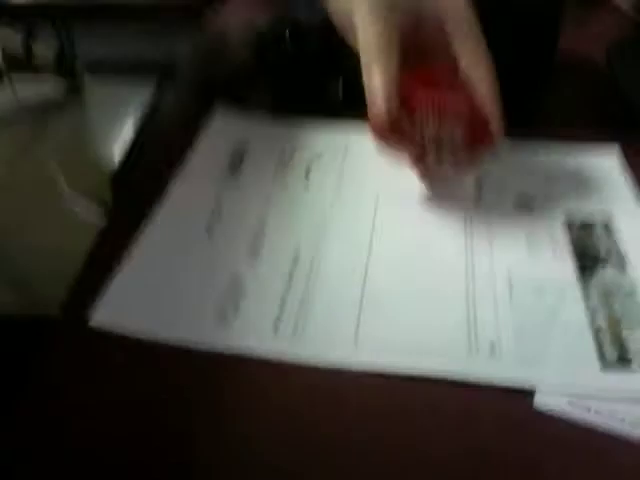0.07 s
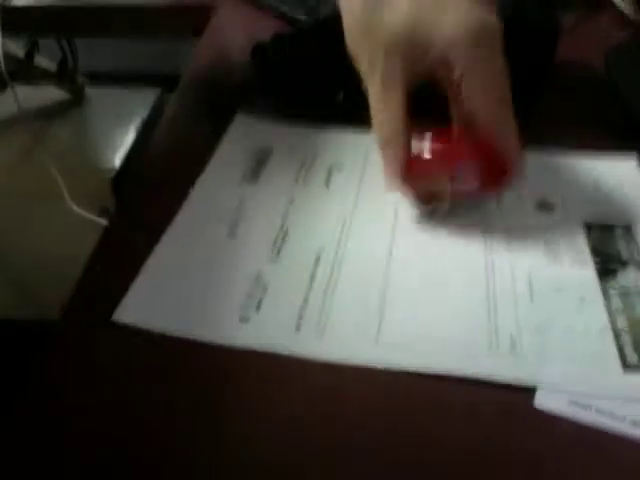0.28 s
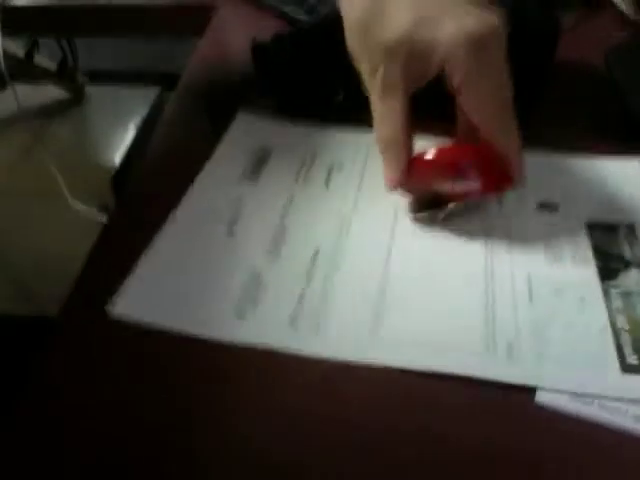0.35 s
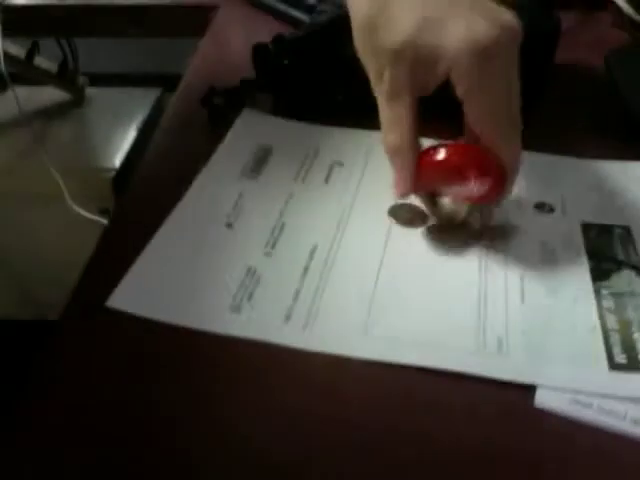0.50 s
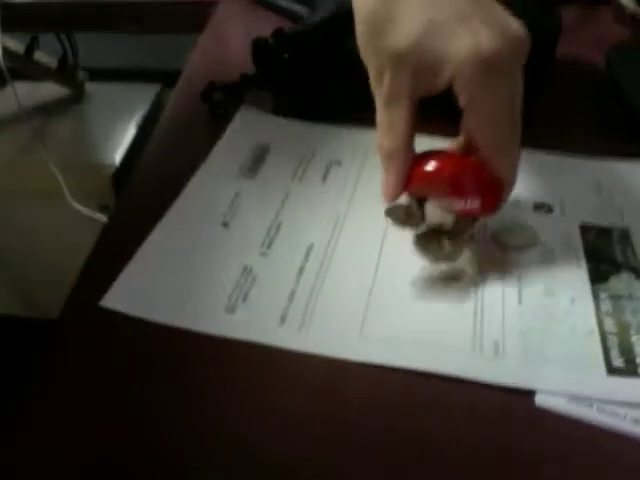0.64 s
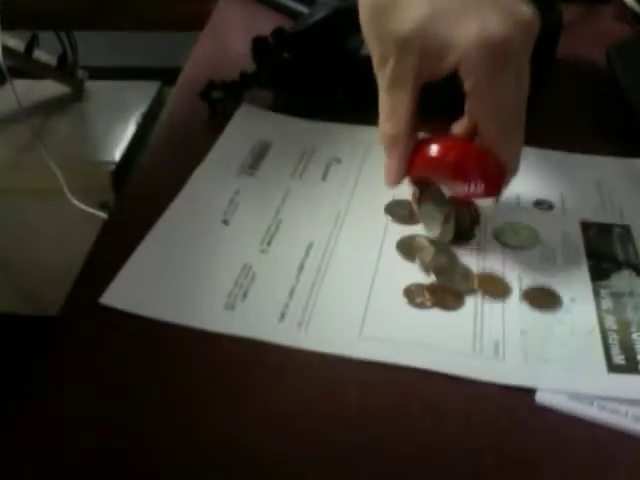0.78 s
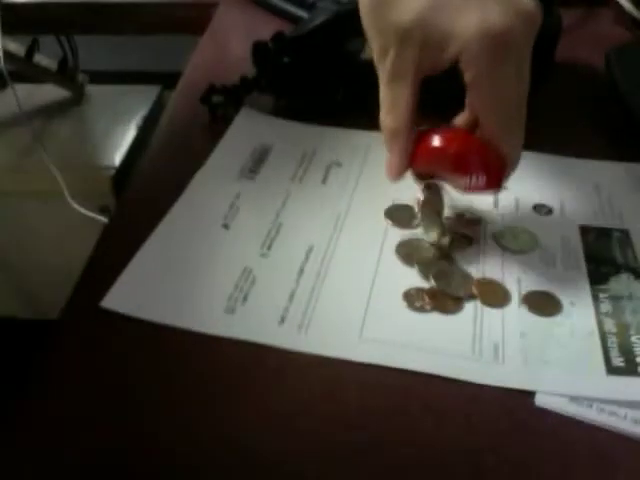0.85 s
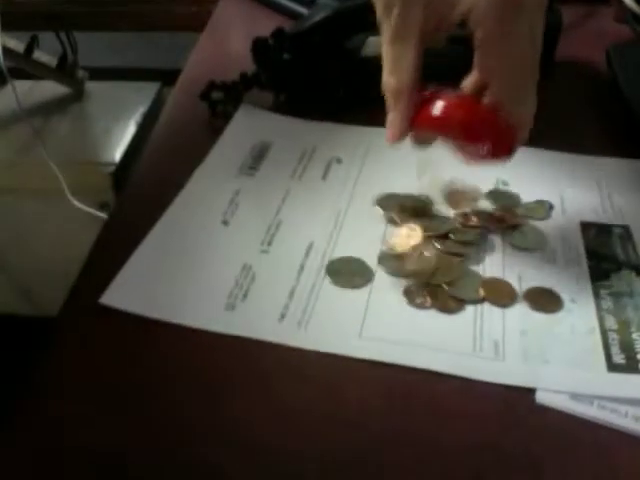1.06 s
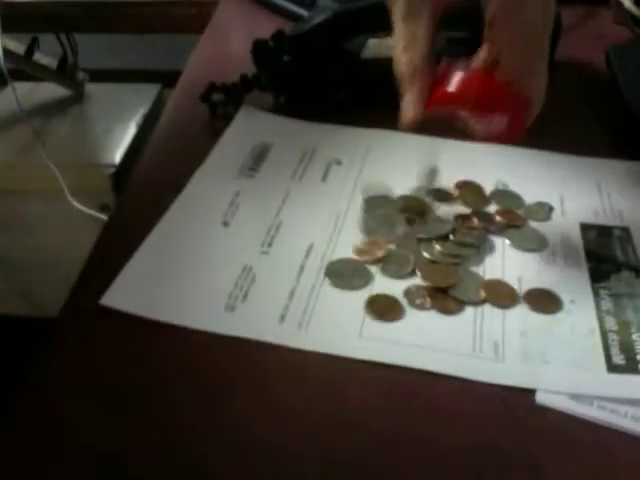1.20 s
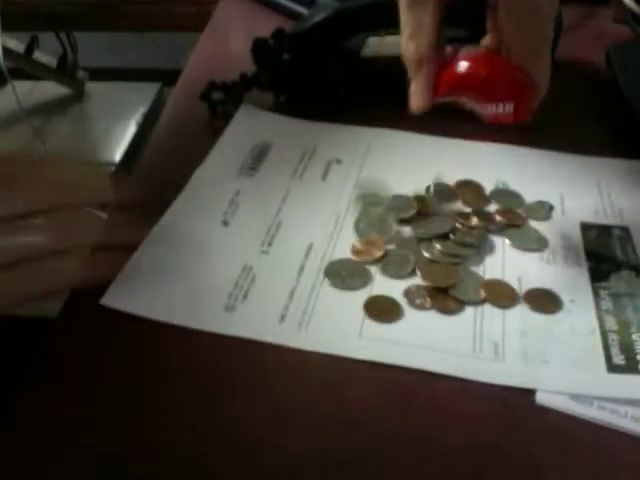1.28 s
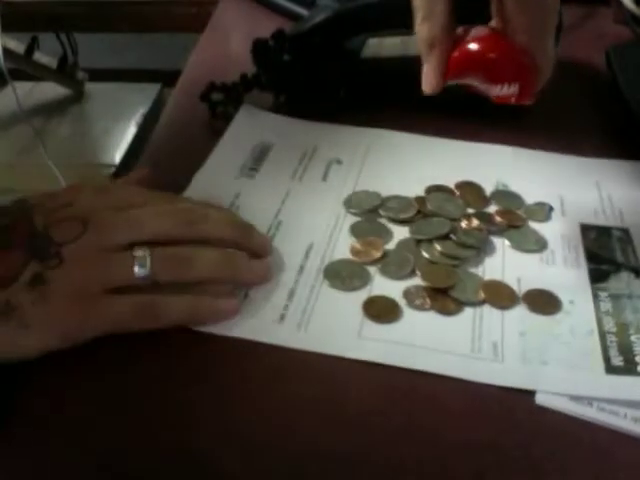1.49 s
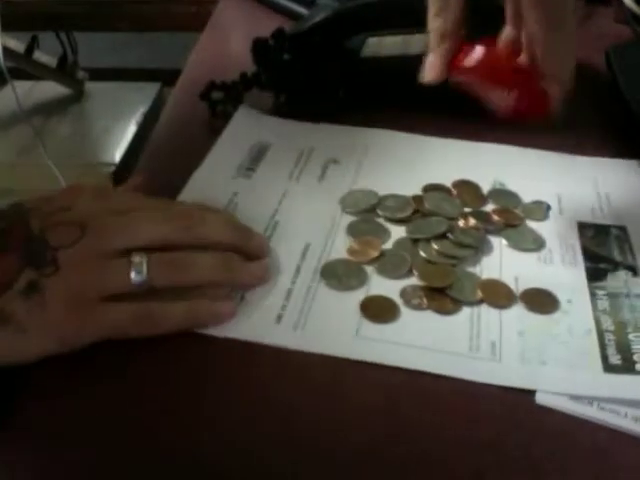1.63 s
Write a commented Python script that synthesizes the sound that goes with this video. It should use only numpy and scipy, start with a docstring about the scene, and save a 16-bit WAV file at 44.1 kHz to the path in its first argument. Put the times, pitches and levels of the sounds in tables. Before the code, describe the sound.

Coins spill onto a paper-covered wooden table, close by in a quiet room. They shift and click in a plastic cup at about 0.2 seconds, then pour out from 0.4 seconds in a dense clatter of hard clacks and high metallic rings. The spill is busiest around 1 second, with a heavier woody knock near 1.2 seconds. The clinks thin out and the last coin settles softly around 1.5 seconds.

```python
"""Coins tipped onto a table

A handful of coins slides from a small plastic cup onto paper on a wooden table, close by in a room.
Each knock is a clack, a thud in the table and a metal tick; between knocks the coins jostle.
Coins that bounce free ring high, heaps land with a woody knock, and the room adds a short tail."""
import sys
import numpy as np
from scipy import signal
from scipy.fft import rfft, irfft
from scipy.io import wavfile
from scipy.ndimage import uniform_filter1d

SR = 44100
rng = np.random.default_rng(int(sys.argv[2]) if len(sys.argv) > 2 else 0)


def to_wav(s):
    """Save 16-bit WAV."""
    ch = np.atleast_2d(s).T  # columns
    pcm = np.round(np.clip(ch, -1, 1) * 32767)  # PCM
    wavfile.write(sys.argv[1], SR, pcm.astype(np.int16))


N = 72765


def undb(db):
    """Decibels to gain."""
    return 10 ** (np.asarray(db) / 20)


def fade(t, t60):
    """Full level until t = 0, then an exponential decay, 60 dB down after t60."""
    return np.exp(-np.log(1000) * np.maximum(t, 0) / t60)


def colour(x, points):
    """Shape a sound to an EQ curve of (Hz, dB) points with a causal filter of unit power gain."""
    hz, db = np.array(points).T
    size = 4096
    freqs = np.maximum(np.arange(size // 2 + 1) * SR / size, 1)
    gain = undb(np.interp(np.log(freqs), np.log(hz), db))
    cepstrum = irfft(np.log(gain))
    cepstrum[1:size // 2] *= 2  # minimum phase keeps the attacks sharp
    cepstrum[size // 2 + 1:] = 0
    response = irfft(np.exp(rfft(cepstrum)))
    return signal.fftconvolve(x, response / np.linalg.norm(response))[:N]


def add(out, start, sound):
    """Mix a sound in from its start time."""
    i = int(np.clip(start * SR, 0, N - 1))
    out[i:i + len(sound)] += sound[:N - i]


def ring(hz, t60, size=SR // 3):
    """One decaying mode."""
    t = np.arange(size) / SR
    return np.sin(2 * np.pi * hz * t) * fade(t, t60)


# The room tone's EQ. Each row: frequency in Hz, relative level in dB.
ROOM_TONE_EQ = [(40, -3.5), (90, -1.5), (200, -7), (350, -9.5), (550, -11), (900, -18), (1400, -26),
                (2700, -18.5), (5000, -30.5), (9000, -32.5), (15000, -43.5)]


def room_tone():
    """A quiet, dark bed of room noise."""
    return undb(-62.5) * colour(rng.standard_normal(N), ROOM_TONE_EQ)


# The table with the cup just above it. Each row: pitch in Hz, relative level in dB, T60 in seconds.
TABLE_MODES = [(116.2, -3.5, 0.34), (160, -27, 0.05), (233, -3, 0.16), (334, -6, 0.13), (453, -8, 0.043),
               (559.7, 5.5, 0.092), (622.3, -4.5, 0.15), (844.4, -0.5, 0.15), (1123, -10, 0.17),
               (1167, -0.5, 0.032), (1377, 1, 0.1), (1766, 4.5, 0.084), (2110, -3.5, 0.038),
               (2460, -0.5, 0.048), (2565, 3, 0.046), (3570, -9.5, 0.086), (4380, -8, 0.14)]
LIGHT_HZ = 417  # coins are too light to drive the modes below this well


def table_ring(times, db):
    """Each blow rings the table and cup, with a mix of modes that depends on where it lands."""
    out = np.zeros(N)
    onsets = np.clip(times * SR, 0, N - 1).astype(int)
    for hz, mode_db, t60 in TABLE_MODES:
        polarity, scatter = rng.standard_normal((len(times), 2)).T
        blows = np.zeros(N)
        np.add.at(blows, onsets, np.sign(polarity) * undb(db + 2 * scatter))
        gain = undb(mode_db - 11.5) / (1 + (LIGHT_HZ / hz) ** 2)
        out += gain * signal.fftconvolve(blows, ring(hz, t60))[:N]
    return out


# A loose coin's partials. Each row: pitch in Hz, relative level in dB, T60 in seconds.
COIN_MODES = [(5950, -2, .025), (6450, 0, .025), (8200, -1, .025), (9300, -1, .06), (10400, -1, .03),
              (12450, -1, .06), (15250, -2, .07)]


def clinks(times, db):
    """Each contact rings a coin, tuned a little differently and soon damped by its neighbours."""
    out = np.zeros(N)
    looseness = np.interp(times, (.45, .95), (.25, 1))  # coins ring longer as the cup empties
    for hz, mode_db, t60 in COIN_MODES:
        for start, level, loose in zip(times, db, looseness):
            detune, scatter = rng.standard_normal(2)
            partial = ring(hz * (1 + .025 * detune), t60 * loose, size=3300)
            add(out, start, undb(level + mode_db - 10 + 4 * scatter) * partial)
    return out


def chatter(times, db, eq, hold_s, t60, attack_s=.00049):
    """A coin chatters for a few milliseconds at each contact, then dies away."""
    out, t = np.zeros(N), np.arange(SR // 16) / SR
    envelope = np.minimum(t / attack_s, 1) * fade(t - hold_s, t60)
    bursts = rng.choice([-1., 1.], (len(times), len(t))) * envelope
    for start, gain, burst in zip(times, undb(db), bursts):
        add(out, start, gain * burst)
    return colour(out, eq)


# EQs of the woody thud, hard clack and bright tick. Each row: frequency in Hz, relative level in dB.
THUD_EQ = [(40, -30), (90, -57.5), (200, -9), (330, -7.5), (540, 3.5), (720, -7.5), (1150, 5), (1500, -1.5),
           (2200, -26.5)]
CLACK_EQ = [(900, -30), (1500, -10), (1950, 0), (2500, 1.5), (3100, -5), (4050, -2.5), (4800, -12.5),
            (7000, -45.5)]
TICK_EQ = [(3500, -25.5), (5200, -2), (6300, 2.5), (7400, -4), (8300, -0.5), (9700, 0.5), (11200, -4),
           (12600, -4), (13700, -8), (15500, -7.5)]


def contacts(times, clack_db, thud_db, tick_db):
    """Each coin contact is a thud, a clack and a tick, and leaves the table and the coin ringing."""
    thud = chatter(times, thud_db - 1, THUD_EQ, hold_s=.0047, t60=.025)
    clack = chatter(times, clack_db + 2.5, CLACK_EQ, hold_s=.0014, t60=.032)
    tick = chatter(times, tick_db + 3.5, TICK_EQ, hold_s=.00071, t60=.024, attack_s=.00057)
    return thud + clack + tick + table_ring(times, (clack_db + thud_db) / 2) + clinks(times, tick_db)


# The jostle's fader moves. Each row: time in seconds, relative clack and tick levels in dB.
JOSTLE_LEVELS = [(0.099, -75, -64), (0.158, -66, -45), (.22, -79, -41.5), (0.279, -43, -32),
                 (.335, -50, -55), (0.389, -43.5, -31.5), (0.5, -40, -30), (.59, -27, -21.5),
                 (0.681, -28.5, -32.5), (.755, -38.5, -32.5), (.81, -29.5, -25.5), (.925, -27.5, -30),
                 (0.958, -22.5, -19.5), (1.07, -21.5, -17.5), (1.21, -35.5, -37.5), (1.333, -23.5, -26),
                 (1.402, -41.5, -41), (1.5, -78.5, -91.5)]


def jostle(count=260, scatter_db=3.5):
    """Many small contacts at uneven moments as the coins slide over each other."""
    cues, clacks, ticks = np.array(JOSTLE_LEVELS).T
    times = cues[0] + (cues[-1] - cues[0]) * (np.arange(count) + rng.random(count)) / count
    clack_db = np.interp(times, cues, clacks) - 4.5 + scatter_db * rng.standard_normal(count)
    tick_db = np.interp(times, cues, ticks) - 6 + scatter_db * rng.standard_normal(count)
    return contacts(times, clack_db, clack_db - 4, tick_db)


# The featured hits. Each row: start in seconds, relative clack level in dB, thud and tick offsets in dB.
KNOCK_CUES = [(0.1263, -64, -8, 14.5), (0.1556, -53, -33, 11.5), (0.1718, -45.5, -47, -7),
              (0.195, -52, -37, 9), (0.207, -53, -44, 8), (0.2313, -9, -6.5, -14),
              (0.267, -20.5, -1.5, -11), (0.278, -20.5, 0, -5.5), (0.2986, -47, 7, 14.5),
              (0.348, -36.5, -4, 3.5), (0.3974, -19.5, -2.5, -32), (0.4159, -29, -22, -4.5),
              (0.4262, -26, -3, -15), (0.443, -11.5, -7, -14.5), (0.4788, -23, -11, -21),
              (0.4869, -15.5, -8, -29), (0.5084, -16, -4, -2.5), (0.5236, -9.5, -8, -31),
              (0.543, -12.5, -8, 0), (0.5595, -15, -10.5, -20), (0.5704, -10, -3, -17),
              (0.599, -16.5, -11, -9), (0.6076, -15, -4.5, -9.5), (0.6218, -15.5, -12, 2),
              (0.6372, -18.5, -1.5, -10), (0.665, -13, -17, -6), (0.719, -27.5, -22, -20),
              (0.7641, -21, -1.5, -10), (0.77, -21.5, -19, -4.5), (0.7894, -15, -4.5, -7.5),
              (0.793, -11.5, -11.5, -9.5), (0.8152, -46.5, -11.5, 1), (0.8322, -28, -5.5, -8),
              (0.851, -15, -7.5, -1.5), (0.876, -23.5, -6, -1.5), (0.884, -25, -21, 4),
              (0.8897, -19.5, -7, -2.5), (0.9224, -22, -2.5, 0.5), (0.9388, -12.5, -6, -9),
              (0.948, -14, -6, -2), (0.9545, -22.5, -1, 5.5), (0.9669, -20, -23, -12.5),
              (0.9809, -15, -13.5, -8.5), (0.9966, -19, -20.5, -2), (1.001, -16.5, -12, -10.5),
              (1.0148, -12.5, -11, -9), (1.027, -14.5, -5, -1.5), (1.0571, -21, -10, -4),
              (1.0771, -24, -0.5, -13.5), (1.0918, -34.5, -19, -7), (1.116, -24, -1, -1.5),
              (1.146, -24, 2.5, -3.5), (1.1522, -19.5, -12, -2.5), (1.1633, -23.5, -20.5, -7),
              (1.1842, -29, 0.5, -1), (1.1985, -27.5, -7, -16.5), (1.228, -14, -9, -1.5),
              (1.2655, -31, -16.5, -15.5), (1.2755, -30.5, -4.5, -2), (1.289, -30, -2, 5),
              (1.3176, -19, -4.5, -4), (1.3318, -32, 1.5, 8), (1.341, -36.5, 8.5, 5),
              (1.371, -33.5, -4, -15), (1.393, -54, -8.5, 9.5), (1.416, -33.5, -1, -22.5),
              (1.4333, -40.5, -10.5, -2.5), (1.448, -33.5, -7.5, -28.5), (1.463, -56, -8, 6)]


def knocks():
    """The distinct blows of coins on the cup, table and pile."""
    times, clack_db, thud_offset, tick_offset = np.array(KNOCK_CUES, float).T
    return contacts(times, clack_db, clack_db + thud_offset, clack_db + tick_offset)


# The plastic cup's EQ. Each row: frequency in Hz, relative level in dB.
CUP_EQ = [(1200, -35.5), (1750, 2), (2150, 8.5), (2600, -9), (3200, -22.5), (4200, 0), (6000, -34.5)]


def cup_slide(start_s=.153, hold_s=.088, slips_per_s=180):
    """Tiny slips of coins along the wall ring the cup as it tilts."""
    t = np.arange(N) / SR - start_s
    chance = slips_per_s / SR
    slips = (rng.random(N) < chance) * rng.standard_normal(N) / np.sqrt(chance)
    envelope = (t > 0) * fade(t - hold_s, t60=.05)
    return undb(-50) * colour(slips * envelope, CUP_EQ)


# Coins ringing free. Each row: start in seconds, pitch in Hz, relative level in dB, seconds until damped.
FREE_RINGS = [(.278, 6126, -34, .004), (.278, 7951, -36, .006), (.455, 9300, -27, .018),
              (.444, 15670, -38, .19), (.48, 9470, -35, .06), (.524, 12780, -31, .25),
              (.56, 15250, -37, .09), (.574, 9530, -27, .045), (.591, 6400, -29, .005),
              (.622, 6500, -28, .005), (.622, 9259, -30, .1), (.655, 15400, -37, .05),
              (.798, 15020, -31, .02), (.852, 15230, -28, .045), (.948, 14930, -27, .075),
              (.948, 9200, -26, .11), (.956, 12480, -27, .045), (.955, 15350, -29, .06),
              (1.015, 15640, -26, .04), (1.03, 12450, -29, .07), (1.06, 11990, -30, .06),
              (1.088, 12200, -24, .014), (1.15, 9200, -36, .13), (1.229, 12530, -32, .03),
              (1.229, 15620, -33, .12), (1.31, 15230, -27, .035), (1.332, 8830, -31, .04),
              (1.332, 9190, -33, .035), (1.335, 12490, -29, .025), (1.434, 9367, -46, .02)]


def free_coins(flutter_hz=170):
    """Coins that bounce clear sing on, shimmering as they tumble and graze, until the pile stops them."""
    out, t = np.zeros(N), np.arange(SR // 3) / SR
    graze_times = np.arange(64) / flutter_hz
    for start, hz, db, free_s in FREE_RINGS:
        grazes = np.exp(2j * np.pi * rng.random(len(graze_times)))
        shimmer = 1 + .95 * np.interp(t, graze_times, grazes)  # level and phase both waver
        tone = (shimmer * np.exp(2j * np.pi * hz * t)).imag
        envelope = fade(t, t60=.6) * fade(t - free_s, t60=.045)
        add(out, start, undb(db + .5) * tone * envelope)
    return out


# Heavy landings of several coins at once. Each row: start in seconds, relative level in dB.
LANDING_CUES = [(.9385, -32), (.949, -34), (1.013, -36), (1.2268, -23), (1.316, -37)]
# The EQ of the table top's bending wave. Each row: frequency in Hz, relative level in dB.
BEND_EQ = [(150, -26), (350, -9.5), (520, 7.5), (720, 1), (950, 5.5), (1300, -0.5), (1700, -15.5),
           (2750, 3), (4000, 4), (6000, -32)]


def landings(travel_s=.005, travel_at_hz=1000):
    """A heap lands: the table's bending wave brings highs before lows, then its modes ring."""
    out = np.zeros(N)
    soft_hz = 1087  # a heap is too soft to drive the modes above this well
    thump = sum(undb(db) / np.hypot(1, hz / soft_hz) / np.hypot(1, LIGHT_HZ / hz) * ring(hz, t60)
                for hz, db, t60 in TABLE_MODES)
    freqs = np.arange(N + 1) * SR / (2 * N)
    falling_sweep = irfft(np.exp(-4j * np.pi * travel_s * np.sqrt(travel_at_hz * freqs)))[:N]
    knock = undb(37.5) * colour(falling_sweep, BEND_EQ)
    for start, db in LANDING_CUES:
        add(out, start, undb(db) * knock)
        add(out, start + travel_s, undb(db) * thump)
    return out


# The last scrape's thin EQ. Each row: frequency in Hz, relative level in dB.
SETTLE_EQ = [(800, -12), (1900, -2), (3500, -16), (4400, -0.5), (5600, -15), (7200, 10.5), (8300, -6.5),
             (12000, -12), (14000, -25.5)]


def settle(start_s=1.537):
    """A last coin settles with a soft scrape."""
    return chatter([start_s], [-52], SETTLE_EQ, hold_s=.0037, t60=.065, attack_s=.00057)


def hum(start_s=1.576, rise_s=.029, hz=333):
    """A faint hum swells in the room at the very end."""
    t = np.arange(N) / SR
    swell = np.clip((t - start_s) / rise_s, 0, 1)
    return undb(-59) * swell * np.sin(2 * np.pi * hz * t)


# The reverb's EQ. Each row: frequency in Hz, relative level in dB.
REVERB_EQ = [(60, -32), (130, 2), (240, 7), (550, -2.5), (1500, -7.5), (3000, -4), (7000, -2.5), (15000, 2)]


def reverb(x, crossover_hz=875, predelay_s=.003):
    """The room's diffuse tail, whose bass lasts longer than its treble."""
    t = np.arange(SR // 2) / SR
    noise = rng.standard_normal(len(t))
    low, high = (signal.sosfilt(signal.butter(3, crossover_hz, kind, fs=SR, output="sos"), noise)
                 for kind in ("low", "high"))
    onset = np.clip(t / predelay_s - 1, 0, 1)
    tail = (low * fade(t, t60=.3) - high * fade(t, t60=.14)) * onset
    wet = signal.fftconvolve(x, tail / np.linalg.norm(tail))[:N]
    return undb(-9.5) * colour(wet, REVERB_EQ)


def suppress(x, above_hz=7000, threshold_db=-51.5, depth_db=-14.5, window_s=.03):
    """A noise suppressor turns the treble down whenever it is faint."""
    treble = signal.sosfiltfilt(signal.butter(2, above_hz, "high", fs=SR, output="sos"), x)
    power = np.abs(uniform_filter1d(treble ** 2, int(window_s * SR)))
    shut = 1 / (1 + power / undb(threshold_db) ** 2)
    return x - treble * shut * (1 - undb(depth_db))


def scene():
    """The mono mix: the coins, their reverb and the quiet room behind them."""
    coins = settle() + cup_slide() + knocks() + jostle() + free_coins() + landings()
    return (coins + reverb(coins) + room_tone() + hum())[None]


def record(dry):
    """The recorder rounds the loudest peaks, ducks faint treble, thins the bass and cuts the top."""
    ceiling, low_cut_hz, top_hz = .61, 155, 15800
    rounded = ceiling * np.tanh(dry / ceiling)
    thinned = signal.sosfilt(signal.butter(3, low_cut_hz, "high", fs=SR, output="sos"), suppress(rounded))
    return signal.sosfilt(signal.ellip(10, .2, 80, top_hz, fs=SR, output="sos"), thinned)


dry = scene()
out = record(dry)
to_wav(out)
```